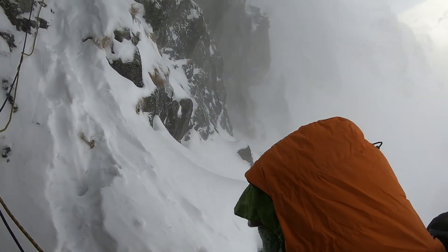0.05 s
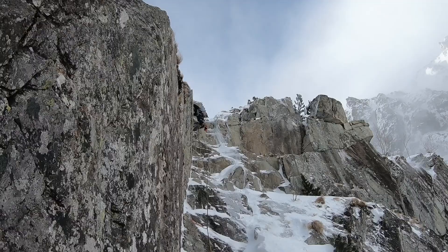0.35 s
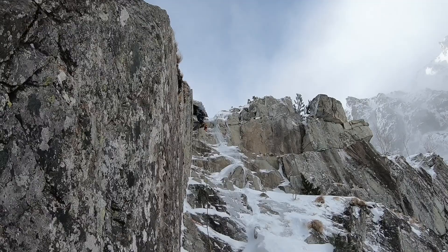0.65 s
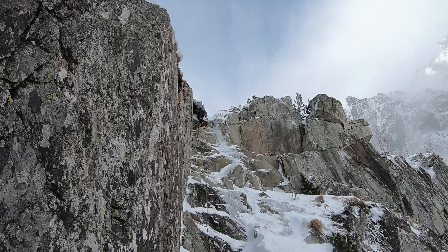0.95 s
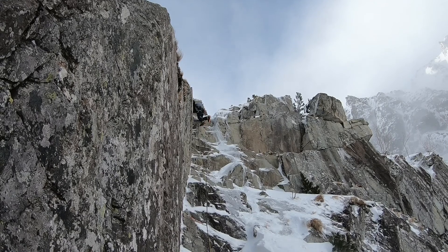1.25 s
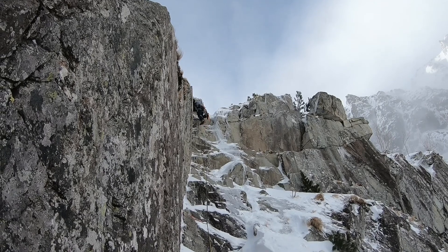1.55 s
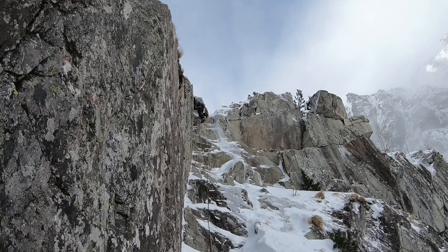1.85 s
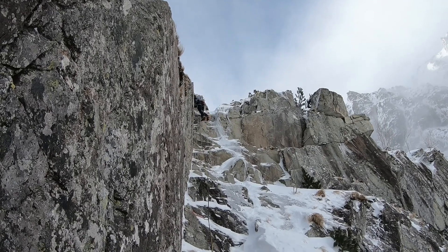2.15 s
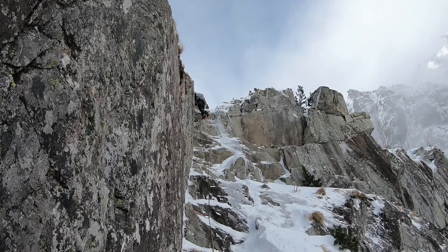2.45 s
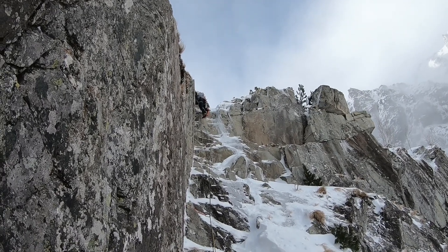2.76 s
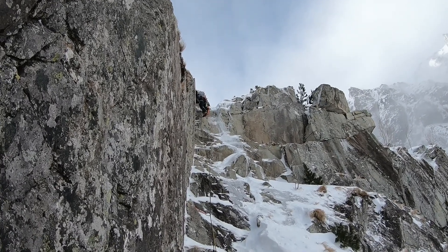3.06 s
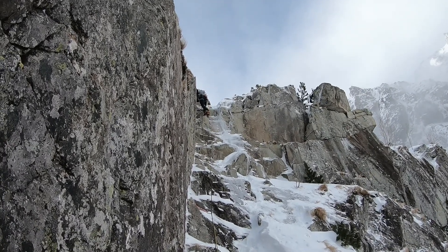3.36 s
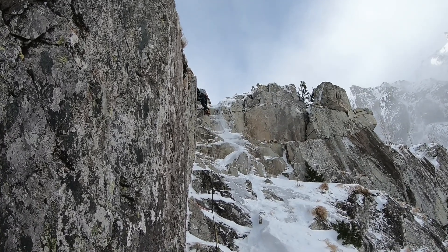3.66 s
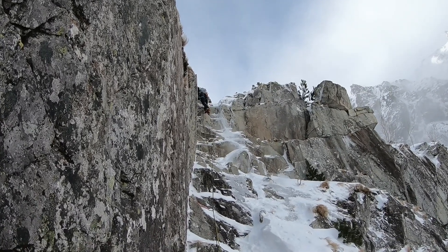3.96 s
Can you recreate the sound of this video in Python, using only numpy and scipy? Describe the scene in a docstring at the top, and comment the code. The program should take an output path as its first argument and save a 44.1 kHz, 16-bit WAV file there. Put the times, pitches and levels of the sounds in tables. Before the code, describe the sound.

Wind rumbles and slaps against the microphone on a snowy mountainside, roars briefly, then drops to a low flutter with faint hissing snow. A short knock follows, and climbing gear clinks and scrapes on rock more and more busily.

```python
"""Gusts buffet a camera microphone on a snowy mountainside, first in a hissing gully, then at a rock face.
Their eddies are pressure fluctuations, heard as rumble, slaps and a brief roar. The wind dies to a low
flutter while grains of blown snow hiss on. A short crunching knock rings a hollow body; then impact
and friction excite the modes of climbing gear, which clinks, ticks and scrapes on rock more and more
busily, with a few soft bumps on the camera."""
import sys
import numpy as np
from scipy import signal
from scipy.fft import rfft, irfft
from scipy.io import wavfile
from scipy.ndimage import map_coordinates

SR = 44100
rng = np.random.default_rng(int(sys.argv[2]) if len(sys.argv) > 2 else 0)


def store_wav(level_fs):
    """Save 16-bit WAV to argv[1]."""
    pcm = np.round(np.clip(np.atleast_2d(level_fs), -1, 1) * 32767)
    wavfile.write(sys.argv[1], SR, pcm.T.astype(np.int16))


N = 176400
TIME = np.arange(N) / SR
SCENE_CHANGE_S = .269  # from the gully to the rock face
GEAR_ATTACK_S = .00065

# Wind at the rock face. Each row: time in seconds, then levels of rumble, flutter and rush in dB.
WIND_LEVELS = [(0.275, -16.5, -22, -59.5), (0.35, -27.5, -41, -75), (0.385, -18, -31.5, -63),
               (0.45, -18.5, -22.5, -61), (0.58, -23, -22.5, -40), (0.635, -27.5, -27, -44),
               (0.7, -24, -29, -49), (0.85, -25, -33.5, -42.5), (0.95, -32.5, -32, -47),
               (1.22, -39, -38, -55), (1.34, -44, -52.5, -55.5), (1.5, -43.5, -44.5, -52),
               (1.85, -47.5, -48, -57), (2.25, -58, -47.5, -58), (2.53, -43.5, -42, -57),
               (2.64, -53, -48, -60), (3.2, -49, -46, -64), (4.0, -55, -46.5, -63.5)]
# Spectrum of spindrift, fine airborne snow. Each row: frequency in Hz, relative density in dB.
SPINDRIFT_SPECTRUM = [(3200, -12), (4650, 4), (6000, -6.5), (8000, -19), (11500, -37)]
# High resonances of gear and ice. Each row: frequency in Hz, half-width in Hz, relative gain in dB.
HIGH_MODES = [(4560, 560, 2.5), (5430, 360, 4.5), (6120, 360, 6), (7160, 520, -3), (8500, 780, -15.5),
              (12600, 1300, -30.5)]


def undb(db):
    """Amplitude ratio of a level in decibels."""
    return 10 ** (np.asarray(db) / 20)


def rms(x):
    """Root-mean-square magnitude."""
    return np.sqrt(np.mean(np.abs(x) ** 2))


def unit(x):
    """Normalisation to rms 1."""
    return x / rms(x)


def bell(age, width):
    """Gaussian pulse of height 1; its width is the standard deviation."""
    return np.exp(-.5 * (age / width) ** 2)


def envelope(table, column=1):
    """Gain through time, by linear interpolation of levels in dB."""
    rows = np.array(table, float)
    return undb(np.interp(TIME, rows[:, 0], rows[:, column]))


def colour(x, spectrum, roll_off_db_per_octave=24.5):
    """Minimum-phase filtering through (Hz, dB) points, rolling off above the last; result at rms 1."""
    hz, db = np.array(spectrum, float).T
    octave = np.log2(np.maximum(np.fft.rfftfreq(N, 1 / SR), 1))
    octaves_above = np.maximum(octave - np.log2(hz[-1]), 0)
    shape_db = np.interp(octave, np.log2(hz), db) - roll_off_db_per_octave * octaves_above
    cepstrum = irfft(np.log(undb(shape_db)), N)
    cepstrum[1:N // 2] *= 2  # folding the cepstrum makes the filter causal
    cepstrum[N // 2 + 1:] = 0
    return unit(irfft(rfft(x) * np.exp(rfft(cepstrum)), N))


def noise(spectrum):
    """Spectrally shaped Gaussian noise at rms 1."""
    return colour(rng.standard_normal(N), spectrum)


def wander(rate_hz):
    """Slow fluctuation at rms 1: noise low-passed to lie below about rate_hz."""
    hz = np.fft.rfftfreq(N, 1 / SR)
    return unit(irfft(rfft(rng.standard_normal(N)) * np.exp(-(2 * hz / rate_hz) ** 2), N))


def ring(x, modes):
    """Modal filtering: steep resonances of alternating sign, keeping the power of white noise."""
    hz = np.fft.rfftfreq(len(x), 1 / SR) + 1
    response = sum((-1) ** k * undb(db) / (1 + 1j * (hz - centre ** 2 / hz) / (2 * half_width)) ** 2
                   for k, (centre, half_width, db) in enumerate(modes))
    return irfft(rfft(x) * response / rms(response), len(x))


def friction(rough_db, size=8820):
    """Stick-slip friction: noise whose strength jumps from one tiny catch to the next."""
    catches = np.repeat(rng.standard_normal(size // 20), 20)
    return unit(rng.standard_normal(size) * undb(rough_db * catches))


def add(out, start, x):
    """Superposition of x on out from a start time in seconds."""
    i = int(start * SR)
    out[i:i + len(x)] += x[:N - i]


def blown_snow(grains_per_s=180, sizzle_db=-63, sizzle_end_s=.92, sizzle_fade_s=.17):
    """Random impacts of snow grains merge into hiss and patter, with an icy sizzle in the big gust."""
    # Strength of the hiss. Each row: time in seconds, level in dB.
    hiss_levels = [(.3, -72.5), (.85, -65.5), (1.6, -75), (2.7, -69.5), (3.4, -67.5), (3.75, -62.5)]
    # Sliding snow or cloth. Each row: centre in seconds, Gaussian width in seconds, level in dB.
    swishes = [(0.846, 0.026, -56.5), (1.029, 0.025, -56), (1.147, 0.13, -56.5)]
    # Spectra of hiss and swish. Each row: frequency in Hz, relative density in dB.
    hiss_spectrum = [(1800, -9.5), (3400, -13.5), (5100, -8), (6600, -13.5), (8300, -20.5), (10500, -32.5),
                     (15500, -41)]
    swish_spectrum = [(1400, 9), (2600, -1), (6500, -4), (9000, -17.5)]
    hits = rng.random(N) < grains_per_s / SR
    strengths = undb(14 * np.minimum(rng.exponential(size=N), 3))
    patter = undb(-13) * unit(ring(hits * strengths, HIGH_MODES))
    hiss = envelope(hiss_levels) * (noise(hiss_spectrum) + patter)
    gust = envelope(WIND_LEVELS)
    flicker = undb(1 + 5 * np.minimum(wander(rate_hz=140), 2))
    crackle = gust / gust.max() * flicker * unit(ring(rng.standard_normal(N), HIGH_MODES))
    carried = undb(sizzle_db) * np.clip((sizzle_end_s - TIME) / sizzle_fade_s, 0, 1)
    sizzle = carried * (noise(SPINDRIFT_SPECTRUM) + crackle)
    swell = sum(undb(db) * bell(TIME - centre, width) for centre, width, db in swishes)
    swish = swell * undb(2.1 * wander(rate_hz=120)) * noise(swish_spectrum)
    return hiss + sizzle + swish


def ice_snaps():
    """Impulse response: crumbs of ice strike the camera and ring as hard little ticks."""
    # Ice impacts. Each row: start in seconds, level of the impulse in dB.
    impacts = [(0.3254, -21), (0.478, -25), (.722, -35)]
    impulses = np.zeros(N)
    for start, db in impacts:
        add(impulses, start, undb([db]))
    return ring(impulses, HIGH_MODES)


def click(level_db=-26, decay_s=.00062):
    """A step with a fast exponential decay makes a broadband click at the change of scene."""
    age = TIME - SCENE_CHANGE_S
    return -undb(level_db) * (age > 0) * np.exp(-np.abs(age) / decay_s)


def camera_bumps():
    """Heavy damping: each soft bump gives a low mode only a few swings."""
    # Bumps. Each row: start in seconds, frequency in Hz, level in dB, envelope rise time in seconds.
    bumps = [(2.9055, 620, -43, 0.0017), (3.396, 495, -38.5, 0.0022), (3.564, 194, -19, 0.002),
             (3.7879, 308, -28.5, 0.0033)]
    out = np.zeros(N)
    for start, hz, db, rise in bumps:
        age = np.maximum(TIME - start, 0)
        swing = (age / rise * np.exp(1 - age / rise)) ** 2
        out += undb(db) * swing * np.sin(2 * np.pi * hz * age)
    return out


def gear_scrapes(release_s=.0039, tail_s=.032, tail_db=-19, pitch_scatter=.056, gain_scatter_db=5.5):
    """Forced vibration: friction on rock rings the gear, a little differently at each contact."""
    # Gear on rock. Each row: start in seconds, contact length in seconds, tick and clack levels in dB.
    contacts = [(2.503, 0.0018, -58, -57), (2.699, 0.0023, -56, -66), (2.841, 0.014, -57, -70),
                (2.905, 0.0018, -61, -49.5), (2.945, 0.0013, -49, -58.5), (2.964, 0.014, -59, -66),
                (2.999, 0.017, -53, -66), (3.196, 0.0047, -50.5, -62), (3.239, 0.0099, -53, -61.5),
                (3.333, 0.0054, -52, -59), (3.3462, 0.0038, -45, -61), (3.396, 0.014, -57.5, -54.5),
                (3.448, 0.023, -58.5, -59), (3.5128, 0.0013, -35.5, -36), (3.61, 0.0026, -50, -54.5),
                (3.655, 0.0029, -48, -55.5), (3.691, 0.0061, -35.5, -36), (3.757, 0.015, -49, -46),
                (3.766, 0.0038, -46, -39.5), (3.8138, 0.0028, -52.5, -47.5), (3.833, 0.0046, -53.5, -45),
                (3.932, 0.0021, -54.5, -50)]
    # Lower resonances of the gear. Each row: frequency in Hz, half-width in Hz, relative gain in dB.
    clack_modes = [(1120, 680, -8.5), (1970, 320, -5), (2550, 176, 3), (3160, 440, -2), (4000, 460, -5)]
    out = np.zeros(N)
    for start, length, tick_db, clack_db in contacts:
        for modes, level_db in ((HIGH_MODES, tick_db), (clack_modes, clack_db)):
            scrape = friction(rough_db=5)
            age = TIME[:len(scrape)]
            after = np.maximum(age - length, 0)
            attack = np.minimum(age / GEAR_ATTACK_S, 1)
            drag = undb(tail_db) * np.exp(-after / tail_s)
            force = attack * (np.exp(-after / release_s) + drag)
            chance = rng.standard_normal((len(modes), 2))
            struck = [(hz * (1 + pitch_scatter * detune), half_width, db + gain_scatter_db * favour)
                      for (hz, half_width, db), (detune, favour) in zip(modes, chance)]
            add(out, start, undb(level_db) * rms(force) * unit(ring(scrape * force, struck)))
    return out


def carabiner_clinks(decay_s=.0034, partner_ratio=1.06):
    """Free vibration: carabiners ring in two close modes, damped by rope and harness."""
    # Clinks. Each row: start in seconds, frequency in Hz, level in dB.
    clinks = [(2.256, 4650, -54.5), (2.592, 5250, -51), (2.701, 4780, -42), (2.766, 6300, -52.5),
              (2.9461, 5970, -42), (3.4277, 5370, -44.5), (3.5136, 2547, -33.5), (3.5128, 5620, -29),
              (3.613, 4170, -40), (3.692, 2880, -41), (3.77, 2330, -31), (3.8536, 4800, -42.5)]
    out = np.zeros(N)
    age = TIME[:SR // 10]
    fade = np.minimum(age / GEAR_ATTACK_S, 1) * np.exp(-age / decay_s)
    for start, hz, db in clinks:
        phase = 2 * np.pi * hz * age
        partner = .5 * np.sin(partner_ratio * phase + 2 * np.pi * rng.random())
        add(out, start, undb(db) * fade * (np.sin(phase) + partner))
    return out


def knock(start_s=2.033, rise_s=.00087, hold_s=.017, release_s=.012, body_db=-34.5, crunch_db=-45.5):
    """Impact excitation: a blow crunches briefly and drives the resonances of a hollow body."""
    # Resonances of the body. Each row: frequency in Hz, half-width in Hz, relative gain in dB.
    body_modes = [(428, 88, 1.5), (630, 39, 0.5), (810, 390, -13), (1330, 71, -6.5)]
    # Spectrum of the crunch. Each row: frequency in Hz, relative density in dB.
    crunch_spectrum = [(2000, 0), (5400, 5), (8500, -21.5)]
    age = TIME - start_s
    force = np.clip(age / rise_s, 0, 1) * np.exp(-np.maximum(age - hold_s, 0) / release_s)
    crush = force * friction(rough_db=2.1, size=N)
    body = undb(body_db) * unit(ring(crush, body_modes))
    crunch = undb(crunch_db) * colour(crush, crunch_spectrum)
    return rms(force) * (body + crunch)


def gully_wind(hiss_db=-51.5):
    """Turbulent pressure arrives in separate low gusts, under a steady hiss of spindrift."""
    # Gusts in the gully. Each row: time in seconds, level in dB.
    gusts = [(0, -15), (.04, -23), (.095, -51), (.14, -25.5), (.183, -16), (.25, -35), (.268, -10.5)]
    # Spectrum of the gusts. Each row: frequency in Hz, relative density in dB.
    gust_spectrum = [(15, 0.5), (70, 1.5), (170, -8.5), (500, -45)]
    return envelope(gusts) * noise(gust_spectrum) + undb(hiss_db) * noise(SPINDRIFT_SPECTRUM)


def thud_and_slaps():
    """Bipolar transients: each is a quick dip and a slower rebound."""
    # First the low thud of the click at the change of scene, then hard slaps of air.
    # Each row: centre of the dip in seconds, level in dB, Gaussian width in seconds.
    transients = [(0.269, -20, 0.00037), (0.3273, -18.5, 0.00026), (0.4355, -7.5, 0.00039),
                  (0.502, -9, .00035), (0.574, -5, 0.00054), (0.6015, -15.5, 0.00013), (.705, -16, .00045),
                  (0.915, -21, 0.00024)]
    out = np.zeros(N)
    for centre, db, width in transients:
        dip = bell(TIME - centre, width)
        rebound = bell(TIME - centre - 4 * width, 3 * width) / 3
        out += undb(db) * (rebound - dip)
    return out


def gust_roar(peak_s=.585, level_db=-32.5, rise_db_per_s=55.5, fall_db_per_s=428, db_per_octave=18):
    """Turbulence grows louder and higher with air speed: the strongest gust builds and breaks off."""
    # Spectrum at the peak of the gust. Each row: frequency in Hz, relative density in dB.
    peak_spectrum = [(400, 0.5), (800, 5.5), (1300, -8.5), (2000, -24.5)]
    early = peak_s - TIME
    under_peak_db = np.minimum(np.maximum(early * rise_db_per_s, -early * fall_db_per_s), 100)
    speed = 2 ** (-np.minimum(under_peak_db, 20) / db_per_octave)
    # Reading the noise more slowly lowers its whole spectrum.
    eddies = map_coordinates(noise(peak_spectrum), [np.cumsum(speed)], mode="mirror")
    flutter = envelope(WIND_LEVELS, column=2)
    lull = np.minimum(2 * flutter / flutter.max(), 1)
    return undb(level_db - under_peak_db + 2 * wander(rate_hz=200)) * lull * eddies


def rock_face_wind(buffet_hz=41.7, calm_depth_db=2.43, gust_depth_db=7.5):
    """Intermittent turbulence on the microphone: the stronger the gust, the burstier its rush."""
    # Spectra of the low, middle and high wind bands. Each row: frequency in Hz, relative density in dB.
    rumble_spectrum = [(20, 10.5), (65, 15.5), (110, 10.5), (170, -11), (400, -60.5)]
    flutter_spectrum = [(60, -26.5), (150, 1.5), (320, -7.5), (600, -25)]
    rush_spectrum = [(250, -5), (480, -1), (750, -5.5), (1200, -13.5), (2400, -26), (5000, -37.5)]
    gust = envelope(WIND_LEVELS)
    depth_db = calm_depth_db + (gust_depth_db - calm_depth_db) * gust / gust.max()
    eddies_db = depth_db * wander(buffet_hz)
    bursts = undb(eddies_db + depth_db * (wander(rate_hz=300) - .45))
    rumble = gust * noise(rumble_spectrum)
    flutter = envelope(WIND_LEVELS, column=2) * noise(flutter_spectrum) * undb(.5 * eddies_db)
    rush = envelope(WIND_LEVELS, column=3) * noise(rush_spectrum) * bursts
    return rumble + flutter + rush


def scene():
    """Superposition of all sources in mono; the gully gives way to the rock face in a 2 ms crossfade."""
    moved = np.clip((TIME - SCENE_CHANGE_S) / .002 + .5, 0, 1)
    air = (1 - moved) * gully_wind() + moved * (rock_face_wind() + gust_roar() + blown_snow())
    contacts = ice_snaps() + gear_scrapes() + carabiner_clinks() + knock() + camera_bumps()
    return (air + thud_and_slaps() + click() + contacts)[None]


def record(dry, cutoff_hz=15500):
    """Band limiting: the camera's steep low-pass filter removes the highest treble."""
    return signal.sosfilt(signal.ellip(8, .2, 70, cutoff_hz, fs=SR, output="sos"), dry)


dry = scene()
out = record(dry)
store_wav(out)
```